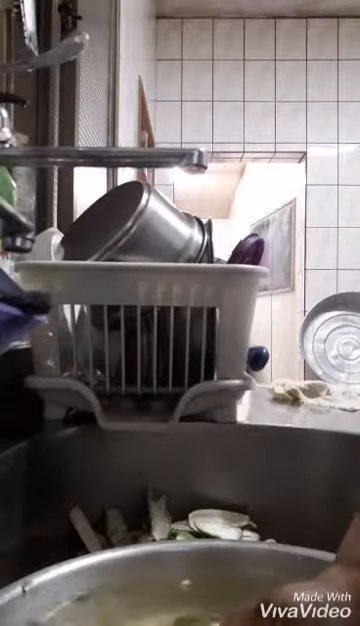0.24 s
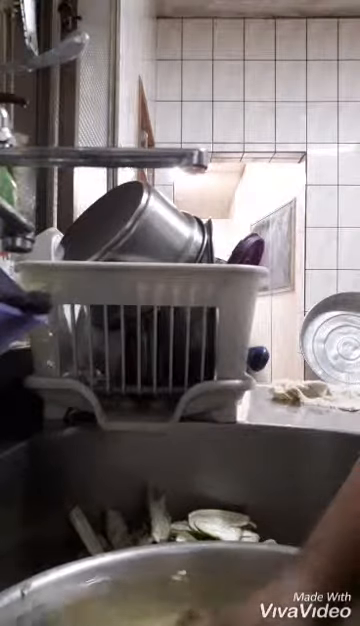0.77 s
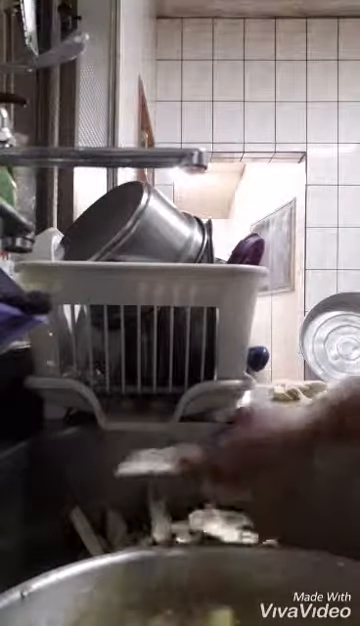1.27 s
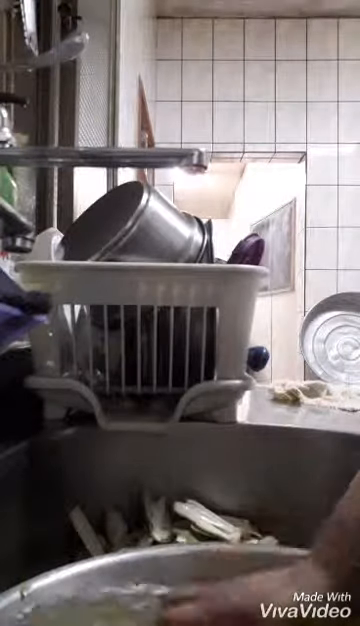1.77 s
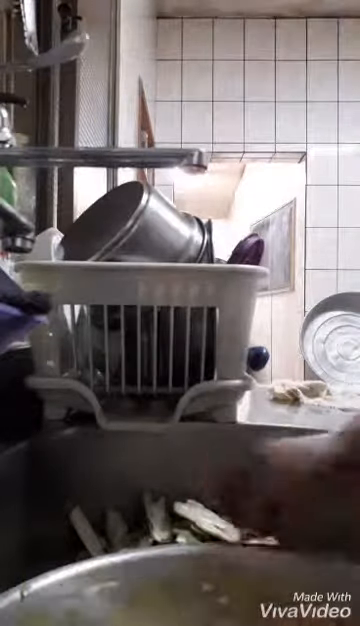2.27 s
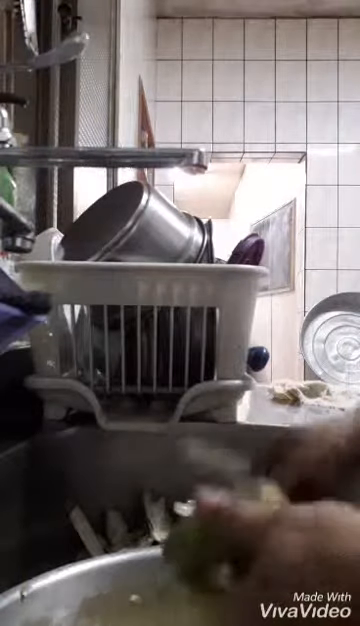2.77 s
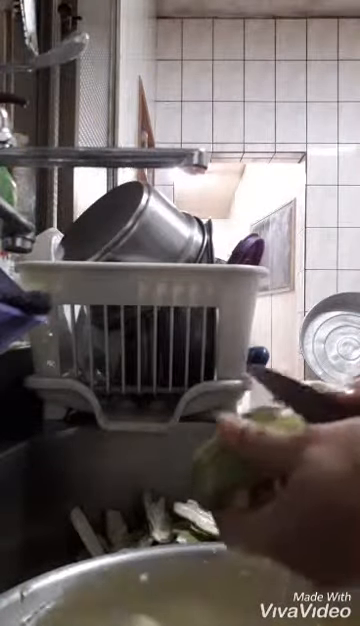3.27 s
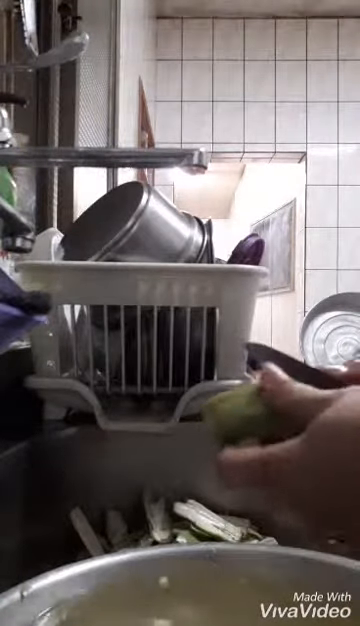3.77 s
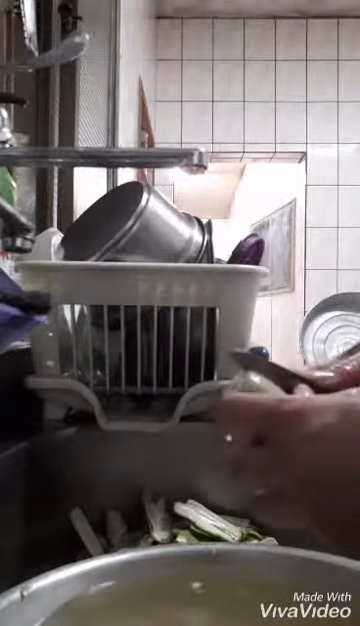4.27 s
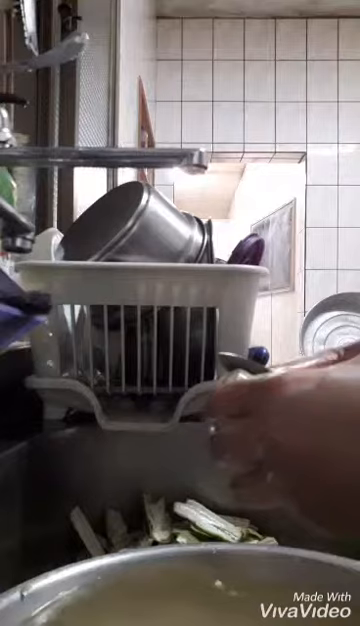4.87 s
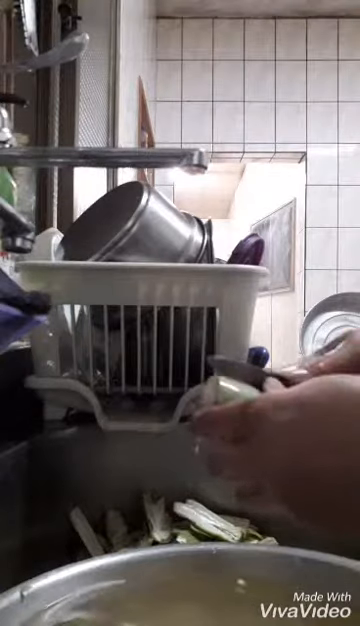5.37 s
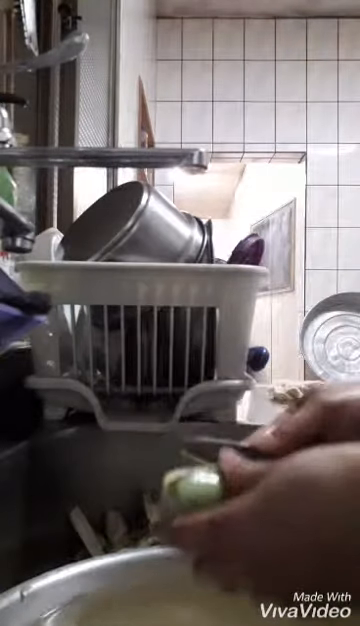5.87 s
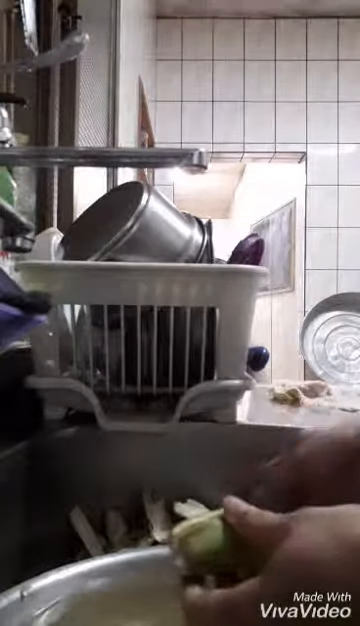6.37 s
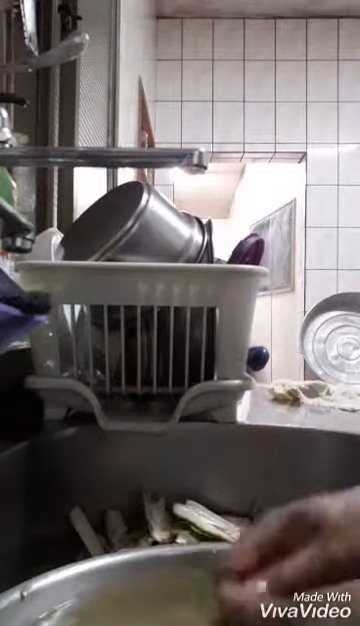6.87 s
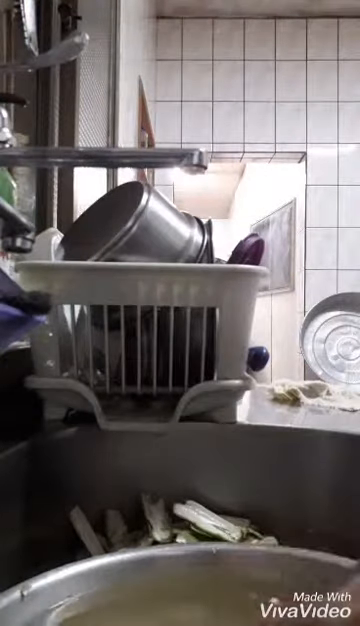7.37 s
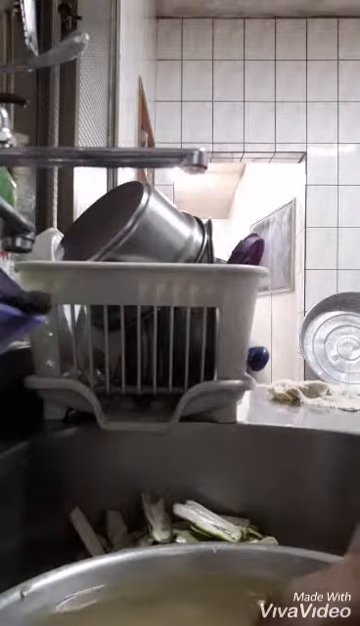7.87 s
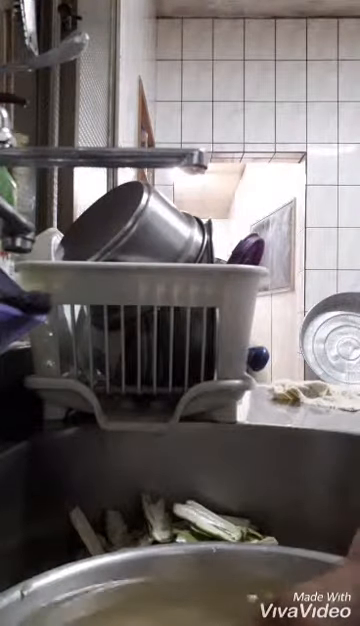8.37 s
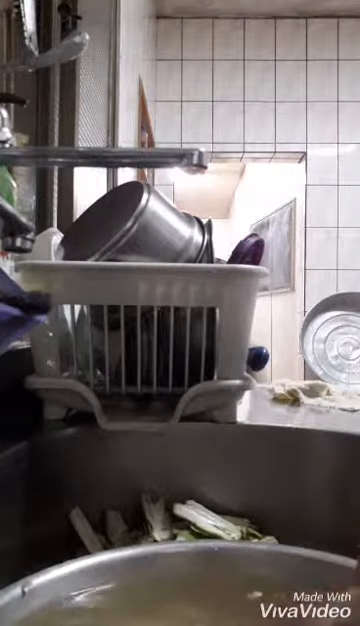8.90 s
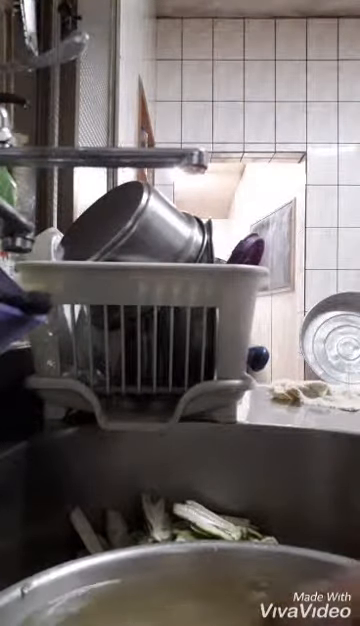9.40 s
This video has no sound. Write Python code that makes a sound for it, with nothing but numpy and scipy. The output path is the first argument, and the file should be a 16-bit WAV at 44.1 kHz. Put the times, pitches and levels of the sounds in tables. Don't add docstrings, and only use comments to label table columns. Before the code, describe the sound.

Close, slightly rough pickup in a small tiled kitchen, with low fridge hum, room air and muffled street roar. From 0 to 3 seconds hands rinse produce in a metal basin: soft pats, a wet slap and hollow knock near 0.5, bubbling plops around 1, fizzy spits and squirts at 1.4, the sharpest splat at 1.9, a bright ringing drip at 2.1. A bubble squeaks upward near 3.1. From 3 to 6 peel crackles and tears sparsely while a low engine revs, rises and leaves, street roar strongest around 5.5; a crisp wet crack lands at 5.8. At 6.6 a knife clatters onto the steel sink, bouncing and ringing, with a heavy bump at 6.75. The background drops sharply. Quiet wet handling and metallic scrapes follow around 7.2-7.9, then near silence, faint scraping at 8.8, and a strong splat cluster at 9.2 as ambience recovers until 9.6.

```python
import sys
import numpy as np
from scipy import signal
from scipy.io import wavfile

SR = 44100
rng = np.random.default_rng(int(sys.argv[2]) if len(sys.argv) > 2 else 0)


def store_pcm(level_fs):
    pcm = np.round(np.clip(level_fs, -1, 1) * 32767).astype(np.int16)
    wavfile.write(sys.argv[1], SR, np.atleast_2d(pcm).T)


def makeup_ratio(level_db):
    decades = np.asarray(level_db, float) / 20
    return 10 ** decades


N = 425124

# t/s, peak level/dB, centre f/Hz
SPLATS = [(0.2902, -29, 2970), (0.4586, -15.5, 2900), (1.0033, -33, 3200), (1.031, -19, 2530),
          (1.55, -26, 4800), (1.894, -12, 4300), (1.913, -13, 4500), (1.9175, -2, 3300),
          (2.2702, -19.5, 1270), (2.303, -19.5, 4970), (2.3975, -21.5, 4480), (2.4762, -26, 2350),
          (3.167, -27, 4150), (3.2091, -25, 3450), (3.7655, -25.5, 5500), (4.1827, -28.5, 2700),
          (5.7945, -6, 5630), (5.811, -18, 3520), (5.831, -16, 4500), (1.4365, -21, 6550),
          (5.8923, -19, 2560), (7.2667, -39, 3800), (7.3082, -31, 2700), (7.652, -36, 6560),
          (7.7224, -18.5, 3000), (7.8722, -31, 2770), (9.148, -21, 5560), (9.1535, -27, 4750),
          (9.1862, -5.5, 3330), (9.199, -25, 3000), (9.2465, -20, 3260), (9.4617, -32.5, 2700),
          (9.4803, -24.5, 5200)]
# t/s, peak level/dB, centre f/Hz
PATS = [(0.237, -37.5, 1870), (0.5547, -32, 1970), (.008, -25.5, 1500), (1.498, -22, 3300),
        (1.876, -26, 3700), (1.858, -15.5, 2230), (1.992, -18.5, 3080), (2.0388, -32, 3180),
        (2.0842, -25, 2170), (2.1057, -14, 3600), (2.823, -34, 1276), (2.8414, -24, 3020),
        (3.0662, -15.5, 2400), (3.1742, -34, 2620), (7.4423, -40, 2890), (7.733, -29, 2000),
        (7.748, -23, 4500), (7.761, -17.5, 2600), (7.768, -23, 3200), (7.59, -42, 2500), (2.822, -34, 3700),
        (8.5136, -38, 3100), (8.8795, -35.5, 4770), (9.1667, -13, 3030), (9.274, -22, 3050),
        (9.2937, -18.5, 3700), (9.3179, -20, 4630)]
# t/s, peak level/dB, centre f/Hz
SPITS = [(0.223, -32, 8600), (1.327, -21.5, 6760), (1.3993, -25, 7100), (1.416, -22, 6800),
         (1.857, -22, 6500), (1.885, -26, 8500), (9.225, -23, 8000), (9.246, -28, 8200),
         (1.4353, -16, 7000), (1.4652, -14.5, 7500), (1.611, -17.5, 8300), (1.646, -20.5, 8300),
         (1.8158, -26.5, 6300), (2.9877, -31, 7300), (3.416, -29, 6830), (3.807, -31, 5500),
         (4.2985, -34, 7500), (4.989, -20.5, 6060), (5.1377, -22, 7700), (5.1991, -17.5, 8060),
         (5.736, -24, 7000), (5.765, -24, 8560), (5.785, -24, 8300), (5.79, -8, 8600), (5.829, -13, 9000),
         (5.838, -19, 9000), (7.243, -39, 7500), (7.27, -36, 8000), (7.446, -39, 8500),
         (5.868, -16.5, 8500), (7.6825, -34, 8290), (7.7025, -34, 7980), (7.805, -16.5, 6000),
         (8.959, -36.5, 8200), (9.0305, -30, 8200), (9.0361, -24, 8200)]
# t/s, peak level/dB, centre f/Hz
CLOSE_PATS = [(1.826, -26, 9000), (2.082, -28, 8800), (2.243, -26, 9000), (2.277, -24, 4000),
              (2.328, -26, 8500), (7.295, -36, 6500), (7.33, -36, 7500), (7.49, -41, 2900),
              (7.515, -43, 5000), (7.62, -43, 6000), (9.024, -36, 3000), (9.147, -24, 2400),
              (9.188, -12, 1300), (9.222, -21, 3000), (9.481, -27, 2000), (9.482, -25, 9000)]
# t/s, peak level/dB, centre f/Hz
TICKS = [(1.2168, -35, 7560), (1.2321, -26, 5200), (1.2516, -28, 7840), (1.5219, -31, 8000),
         (1.6676, -27, 8560), (1.726, -32, 8830), (1.901, -18, 6500), (2.0502, -26, 6050),
         (2.149, -22, 5700), (2.2394, -25, 6080), (2.2872, -18.5, 5370), (2.3255, -28, 8400),
         (2.786, -31, 7730), (2.9625, -33, 9210), (3.0078, -34, 7760), (3.0842, -34, 7360),
         (3.1253, -35.5, 8490), (3.1829, -30, 8670), (3.2425, -31, 8850), (3.5334, -28.5, 8900),
         (3.6431, -31.5, 7600), (4.5984, -32.5, 8400), (4.9252, -33, 5420), (5.4494, -28.5, 7540),
         (6.045, -27, 6890), (7.3844, -42, 8050), (8.1466, -45, 8180), (8.68, -50.5, 6000),
         (1.47, -24, 3580), (1.438, -21, 2900), (8.7914, -49.5, 8430)]
# t/s, peak level/dB, centre f/Hz
THUDS = [
    (2.062, -24, 300),
    (2.3, -41, 350),
    (7.73, -22.5, 810),
    (6.752, -13, 400),
    (9.187, -21, 420),
]
# t/s, peak level/dB, centre f/Hz
TAPS = [(.555, -25.5, 500), (.607, -26, 550), (.638, -28, 500), (.69, -30, 700), (1.993, -24.5, 600),
        (2.011, -25, 500), (2.039, -28, 450), (2.057, -29, 350), (2.69, -25, 400), (2.72, -31, 452),
        (7.85, -37, 500), (7.802, -38, 500), (2.11, -30, 1500)]
# start t/s, length/s, splash level/dB, gurgle re splash/dB
STROKES = [(0, 0.05, -55.5, 14.5), (0.467, 0.27, -57.5, 13), (0.976, 0.19, -59, 1), (1.189, 0.15, -51, -25),
           (1.576, 0.11, -46, -6), (1.859, 0.15, -39.5, -2), (1.93, 0.2, -46, 2), (2.652, 0.39, -57, -6),
           (7.36, 0.27, -60, -5), (7.54, 0.29, -60, -11), (7.757, 0.28, -60, 1.5), (9.303, 0.4, -60, -3)]
# start t/s, length/s, fizz level/dB, splash re fizz/dB
TEARS = [(0.228, 0.036, -44, 3), (1.126, 0.066, -56, 5), (1.317, 0.13, -48, -2), (2.105, 0.33, -48, 5),
         (3.75, 0.39, -53.5, 9), (3.977, 0.054, -50.5, 4), (4.078, 0.054, -45, 1), (4.175, 0.042, -42.5, 0),
         (4.276, 0.039, -45, 0), (4.8, 0.45, -48.5, 1), (5.125, 0.16, -34.5, -30),
         (5.727, 0.21, -33.5, -10), (7.22, 0.16, -50, -6), (7.716, 0.07, -38.5, 1),
         (8.816, 0.21, -58, -4.5), (9.008, 0.12, -51.5, -2.5), (9.146, 0.05, -42, 2),
         (9.16, 0.22, -43.5, 0)]
# t/s, peak level/dB, f/Hz
DRIPS = [(0.246, -29, 1750), (1.3, -33, 3650), (1.245, -37, 2900), (1.292, -33, 2900), (1.381, -37, 2360),
         (1.459, -28, 3700), (2.117, -22, 3770), (2.127, -23, 3480), (2.137, -31, 3800), (2.143, -28, 4050),
         (2.158, -31, 4000), (2.181, -28, 3900), (1.53, -35, 2300), (1.2, -38, 6100), (1.335, -19.5, 6330),
         (1.443, -27, 5500), (1.466, -18, 7100), (1.424, -30, 7100), (3.417, -23, 5500), (2.4, -30, 3140),
         (2.085, -35, 2160), (2.219, -24, 3350), (1.271, -25, 4140), (1.421, -30, 2500),
         (1.4265, -25, 2460), (1.436, -22, 3430), (2.1053, -7, 3880), (2.2043, -24, 2270),
         (2.2189, -24.5, 2210), (2.8663, -28.5, 2460), (3.1729, -14, 2440), (3.209, -18.5, 3170),
         (3.2787, -26, 3950), (4.2985, -21, 5500), (7.7, -42, 2400)]
# t/s, peak level/dB, f/Hz, t60/s
PLOPS = [(1.044, -20, 920, 0.05), (1.612, -22, 900, 0.08), (1.633, -32, 910, .07), (1.648, -33, 890, .06),
         (1.664, -34, 900, .14), (1.604, -30, 520, .06), (1.47, -33, 2050, .15), (1.057, -23, 960, .08),
         (1.043, -27, 1300, .02), (1.94, -31, 780, .1), (1.98, -31, 760, .06), (2.178, -31, 680, .05),
         (1.615, -28, 450, .08), (3.07, -31.5, 1070, 0.046), (3.096, -36, 1350, .05),
         (3.174, -30, 2420, 0.18), (3.094, -37, 3950, 0.05), (7.098, -38, 3200, .04),
         (7.586, -44, 1580, .05), (7.306, -38, 1900, .03), (1.594, -32, 600, .06), (2.232, -28, 900, .04),
         (2.312, -27, 1250, .04), (1.629, -26, 1300, .015), (5.81, -25, 1200, .05),
         (1.917, -18.5, 820, 0.049), (2.164, -30, 657, 0.051), (1.9, -27, 880, 0.047),
         (2.204, -31, 1330, 0.044), (2, -45, 1300, .03), (2.1, -37, 960, .03), (1.917, -17, 1800, .03),
         (1.866, -27, 2000, 0.068), (0.011, -35, 1800, 0.09), (1.222, -41, 1300, .03),
         (2.269, -22, 1144, 0.067)]
# t/s, peak level/dB, f/Hz
SQUIRTS = [
    (1.432, -25, 2900),
    (1.465, -23, 3640),
    (1.5, -35, 3700),
    (2.256, -33, 3500),
    (2.738, -34, 3600),
    (3.068, -20, 4160),
]
# t/s, peak level/dB, f/Hz, t60/s
BUMPS = [
    (.46, -22.5, 307, 0.075),
    (.513, -19, 303, 0.024),
    (.526, -21, 330, 0.025),
    (6.748, -9, 341, 0.074),
    (6.757, -5, 311, 0.044),
    (6.768, -12, 395, 0.047),
    (6.75, -12, 878, 0.035),
    (6.75, -27, 130.4, 0.36),
]
# f/Hz, level/dB, t60/s
BASIN = [(867, -18, 0.03), (1762, -0.5, 0.046), (2562, -0.5, .055), (3420, -5, 0.033), (4540, -20, .033)]
# f/Hz, level/dB, t60/s
BLADE = [(2920, -37, .02), (4800, -40, .012), (7250, -37, .025), (8130, -34, .025)]
# t/s, blow level/dB, crack level/dB
KNIFE = [
    (6.591, -16.5, 12.5),
    (6.6165, -19, 3),
    (6.62, -25.5, 2),
    (6.626, -28, -3),
    (6.655, -23, -14),
    (6.675, -25, -7),
    (6.753, -34, -14.5),
    (6.796, -50, -28),
]
# level/dB, t60/s
SINK = [(-5, .4), (5, 0.25), (1, 0.3), (-4, .3), (-3, 0.3), (-8, .15), (-3, 0.25), (-14, .3), (-6, 0.55),
        (2.5, 0.55), (1, .3), (0, 0.14), (-2.5, .5), (-6, .35), (-5, .25), (-1, .3), (-3, .15), (-9, .12),
        (-8, .2), (4.5, .1), (-12, .15), (-14, .2), (-14, .06), (-11, .1), (-16.5, .15), (-13, .4),
        (-9, .3), (-4, .25), (-4, .25), (-7, .08), (-11, .5)]
SINK_HZ = [428, 719, 1000, 1241, 1271, 1330, 1408, 1440, 2066, 1524, 1592, 2050, 2083, 2140, 2384, 2668,
           2901, 3451, 3657, 4297, 4791, 5383, 6400, 7140, 8075, 1978, 2303, 2580, 2720, 3940, 1503]
# t/s, firing f/Hz
ENGINE = [
    (3.2, 40.1),
    (3.9, 48.5),
    (4.85, 57.5),
    (5.4, 61.5),
    (6.6, 70.3),
    (7.6, 75.3),
]
# f/Hz, width/Hz, level/dB
WINDOW = [(48.5, 3.7, -50), (57.5, 2.8, -46), (61.5, 0.92, -55.5), (66.94, 3.6, -62), (96.5, 16, -52.5),
          (119, 2.9, -44), (136.8, 4.2, -49.5), (150, 3, -61), (168, 3.3, -46)]
# middle t/s, length/s, f/Hz, glide/(Hz/s), level/dB
DRONES = [
    (0.77, 0.31, 140, -17.5, -48.5),
    (1.9, 3.1, 151, -18, -49),
    (5.45, 3.2, 156, -2, -42.5),
    (5.15, 0.81, 169, -13.5, -46),
    (5.35, 0.37, 336.4, -23.5, -43.5),
]
# middle t/s, length/s, f/Hz, glide/(Hz/s), level/dB
WHINES = [
    (.3, 3.6, 1960, 0, -63),
    (9.56, .22, 1667, 0, -64),
    (8.6, 8, 3150, 0, -77),
]
# t/s, level/dB
STREET = [(0, -47), (.6, -49), (1.5, -45), (2.6, -48), (3.5, -45), (4, -42), (4.5, -40), (5.2, -33.5),
          (5.5, -32.5), (6, -35), (6.6, -38.5), (6.95, -48), (7.4, -49), (9.64, -54)]
# f/Hz, level per Hz/dB
STREET_COLOUR = [(18, -58), (30, -31), (54, -24.5), (88, -28), (157, -0.5), (276, -8.5), (327, -7),
                 (438, -13), (601, -11), (679, -10.5), (909, -15), (2860, -21.5), (10200, -42),
                 (13200, -63), (22000, -120)]
# f/Hz, width/Hz, level/dB
STREET_RINGS = [(243, 13, -0.3), (332, 14, 1), (420, 20, -1.5), (598.4, 21, 1), (782, 40, 2),
                (912, 13, 1.5), (994, 20, 0.4), (1155, 25, 2.5), (1282, 22, 2.5), (2868, 43, 0.5)]
# f/Hz, level per Hz/dB
ROOM_AIR = [(28, -54.5), (50, -16.5), (86, -10), (150, -4), (200, -18.5), (440, -28), (870, -19),
            (2500, -25.5), (3150, -27), (3600, -27.5), (10200, -39.5), (11500, -60)]
# t/s, gain/dB
GAIN = [
    (0, 0),
    (6.7, -3),
    (6.95, -8),
    (7.4, -13),
    (9.1, -12.5),
    (9.3, -6),
    (9.64, -3.5),
]

BLADE_FROM_S = 7.2
SHARP_ATTACK_S, SOFT_ATTACK_S = 0.0004, 0.0009
DRIP_CYCLES, SQUIRT_CYCLES = 60, 55


def rms_one(x):
    return x / np.sqrt(np.mean(x ** 2) + 1e-20)


def in_time(rows):
    times_s, *columns = np.transpose(rows)
    return [np.interp(np.arange(N) / SR, times_s, column) for column in columns]


def drift(rate_hz):
    r = np.exp(-80 * np.pi * rate_hz / SR)
    slow = signal.lfilter([1], [1, -2 * r, r * r], rng.standard_normal(N // 40 + 2002))[2000:]
    return np.interp(np.arange(N) / 40, np.arange(len(slow)), rms_one(slow))


def band(x, low_hz, high_hz):
    edges_hz = [low_hz, min(high_hz, 0.45 * SR)]
    return signal.sosfilt(signal.butter(2, edges_hz, "band", fs=SR, output="sos"), x)


def ring(clicks, hz, t60_s):
    r, w = makeup_ratio(-60 / (t60_s * SR)), 2 * np.pi * hz / SR
    return signal.lfilter([0, np.sin(w)], [1, -2 * r * np.cos(w), r * r], clicks + 1e-18)


def add(out, s, piece):
    i = round(s * SR)
    out[i:i + len(piece)] += piece[:N - i]


def bursts(events, t60_s, width, snap_db=-60, attack_s=0.0036):
    out, t = np.zeros(N), np.arange(3000) / SR
    shape = (1 - np.exp(-t / attack_s)) * makeup_ratio(-60 * t / t60_s)
    for (s, peak_db, hz), white in zip(events, rng.standard_normal((len(events), 2, len(t)))):
        edges_hz = hz / width, min(hz * width, 10500)
        core = band(band(white[0] * shape, *edges_hz), *edges_hz)
        snap = band(white[1] * shape, 3100, 10100)
        slap = core / np.abs(core).max() + makeup_ratio(snap_db) * snap / np.abs(snap).max()
        add(out, s, makeup_ratio(peak_db - 6.5) * slap)
    return out


def fizz(low_hz, high_hz, per_s, cycles, hiss):
    sizes = makeup_ratio(3.6 * np.minimum(rng.exponential(1, N), 4)) * rng.choice([-1, 1], N)
    born = rng.random(N) < per_s * makeup_ratio(5 * drift(25)) / SR
    pitches_hz, dealt = np.geomspace(low_hz, high_hz, 14), rng.integers(0, 14, N)
    grains = sum(ring(sizes * born * (dealt == k), hz, cycles / hz) for k, hz in enumerate(pitches_hz))
    grains = rms_one(band(grains, 0.98 * low_hz, 1.16 * high_hz))
    return rms_one(grains + hiss * rms_one(band(rng.standard_normal(N), low_hz, high_hz)))


def slosh():
    treble = fizz(5200, 10300, 2000, 35, 0.8)
    splash = fizz(1100, 5500, 600, 24, 0.8)
    gurgle = band(fizz(170, 1100, 220, 1.8, 0.44), 130, 1800)
    gates = np.zeros((3, N))
    strokes = [(s, length_s, db - 2.5, db, db + low_db) for s, length_s, db, low_db in STROKES]
    tears = [(s, length_s, db, db + mid_db, db + mid_db - 15.5) for s, length_s, db, mid_db in TEARS]
    for s, length_s, *levels_db in strokes + tears:
        t = np.arange(round(length_s * SR)) / length_s / SR
        shape = np.clip(np.minimum(t / 0.22, (1 - t) / 0.5), 0, 1)
        for gate, level_db in zip(gates, levels_db):
            add(gate, s, makeup_ratio(level_db) * shape)
    return np.sum(gates * (treble, splash, gurgle), axis=0)


def bubbles(events, onset_s, rise_octaves):
    out, t = np.zeros(N), np.arange(9000) / SR
    shaking = makeup_ratio(2.5 * drift(40))
    for s, peak_db, hz, t60_s in events:
        pitch_hz = hz * 2 ** (rise_octaves * (0.6 - np.exp(-t / 0.0026)))
        shape = (1 - np.exp(-t / onset_s)) * makeup_ratio(-60 * t / np.clip(t60_s, 0.01, 0.3))
        sine = np.sin(2 * np.pi * np.cumsum(pitch_hz) / SR)
        add(out, s, makeup_ratio(peak_db - 6.0) * shape / shape.max() * sine)
    return out * shaking


def ringing(events, cycles):
    return [(s, peak_db, hz, cycles / hz) for s, peak_db, hz in events]


def droplets():
    events = []
    for s, length_s, splash_db, _ in STROKES:
        if s >= BLADE_FROM_S:
            continue
        luck = rng.random((16, 3))[:int(length_s * 60)]
        for when, small, high in luck:
            peak_db = min(splash_db, -50) + 14 - 8 * small
            events.append((s + length_s * when, peak_db, 1900 * 2.6 ** high))
    return bubbles(ringing(events, DRIP_CYCLES), 0.0015, 0.2)


def knock():
    clicks = np.zeros(N)
    for s in (0.4587, 0.4612):
        clicks[round(s * SR)] = makeup_ratio(-26)
    return sum(makeup_ratio(level_db) * (-1) ** k * ring(clicks, hz, t60_s)
               for k, (hz, level_db, t60_s) in enumerate(BASIN))


def blade(water):
    late = water * (np.arange(N) > BLADE_FROM_S * SR)
    return sum(makeup_ratio(level_db) * ring(late, hz, t60_s) for hz, level_db, t60_s in BLADE)


def knife():
    table, out = np.array(KNIFE), np.zeros(N)
    start_s = table[0, 0]
    at = np.round((table[:, 0] - start_s) * SR).astype(int)
    blows, hits = np.zeros((2, SR))
    blows[at], hits[at] = makeup_ratio(table[:, 1]), makeup_ratio(table[:, 2])
    tip_blows = blows * np.r_[makeup_ratio(-12), np.ones(SR - 1)]
    crack, rattle = (signal.lfilter([1], [1, -makeup_ratio(-60 / (t60_s * SR))], hits + 1e-18)
                     for t60_s in (0.025, 0.42))

    modes = [(hz, *mode) for hz, mode in zip(SINK_HZ, SINK)]
    thicket_hz = np.sort(rng.uniform(1300, 6000, size=90))
    for hz, luck in zip(thicket_hz, rng.uniform(-1.1, 1, size=90)):
        modes.append((hz, -22 - 4 * np.log2(hz / 2000) + 1.5 * luck, 700 / hz))
    sheet = np.zeros(SR)
    for k, (hz, level_db, t60_s) in enumerate(modes):
        drive = (tip_blows if hz < 1100 else blows) + makeup_ratio(-66) * rattle * rng.standard_normal(SR)
        sheet += makeup_ratio(level_db) * (-1) ** k * ring(drive, hz, t60_s)
    t = np.arange(SR) / SR + start_s
    sheet *= makeup_ratio(-5 * np.clip((t - 6.725) / 0.03, 0, 1))

    noise = 0.77 * band(rng.standard_normal(SR) * crack, 3300, 5300)
    noise += makeup_ratio(-22) * band(rng.standard_normal(SR) * rattle, 2400, 5400)
    noise += 0.11 * (crack + 0.03 * rattle) * rng.standard_normal(SR)
    add(out, start_s, sheet + noise)
    return out


def kitchen(x):
    t60_s, first_echo_s = 0.36, 0.0063
    t = np.arange(SR // 2) / SR
    white = rng.standard_normal(len(t)) * np.clip(t / first_echo_s - 1, 0, 1)
    low = signal.lfilter(*signal.butter(1, 4500, fs=SR), white)
    tail = low * makeup_ratio(-60 * t / t60_s) + (white - low) * makeup_ratio(-60 * t / t60_s / 0.63)
    return signal.fftconvolve(x, tail / np.sqrt(np.sum(tail ** 2)))[:N]


def tone(hz, level_db, wobble_db):
    phase = 2 * np.pi * np.cumsum(hz) / SR
    return np.sqrt(2) * makeup_ratio(level_db + wobble_db * drift(2.6)) * np.sin(phase)


def engine():
    t, out = np.arange(N) / SR, np.zeros(N)
    near_db = 0.59 * (in_time(STREET)[0] + 41) + in_time(GAIN)[0]
    near = makeup_ratio(near_db) * np.clip((t - 3.5) / 0.3, 0, 1)
    for order_hz in in_time(ENGINE)[0] * [[1], [2], [3]]:
        window = sum(makeup_ratio(level_db) * np.exp(-((order_hz - hz) / width_hz) ** 2)
                     for hz, width_hz, level_db in WINDOW)
        out += near * window * tone(order_hz, 0, wobble_db=0.5)
    return out


def far_motors():
    t, out = np.arange(N) / SR, np.zeros(N)
    for s, length_s, hz, glide_hz_per_s, level_db in DRONES + WHINES:
        away = 2 * (t - s) / length_s
        faded_db = level_db - 19.5 * np.minimum(away ** 2, 4)
        out += (np.abs(away) < 1.5) * tone(hz + glide_hz_per_s * (t - s), faded_db, wobble_db=2.5)
    return out


def banded_noise(spectrum, patchy_db, tilt_db=0):
    edges_hz = 28 * 2 ** np.arange(0, 8.7, 1 / 3)
    white = rng.standard_normal((2, N))
    table_hz, table_db = np.transpose(spectrum)
    out, power = 0, 0
    for k, (low, high) in enumerate(zip(edges_hz, edges_hz[1:])):
        hz = np.sqrt(low * high)
        level_db = np.interp(np.log(hz), np.log(table_hz), table_db)
        power += makeup_ratio(level_db) ** 2 * (high - low) * 2 / SR
        band_db = level_db + tilt_db * np.log2(hz / 1000) + patchy_db * drift(7.4)
        out = out + makeup_ratio(band_db) * band(white[k % 2], low, high)
    return out / np.sqrt(power)


def street():
    level_db, = in_time(STREET)
    tilt_db = 2.5 + 0.0644 * (level_db + 43.0)
    roar = makeup_ratio(level_db + 0.5) * banded_noise(STREET_COLOUR, 0.65, tilt_db)
    hollows = sum(makeup_ratio(ring_db) * signal.lfilter(*signal.iirpeak(hz, hz / np.clip(width_hz, 5, 200), SR), roar)
                  for hz, width_hz, ring_db in STREET_RINGS)
    return roar + hollows


def background():
    hum = tone(np.full(N, 121), -50.5, wobble_db=1.0)
    air = makeup_ratio(-50.5) * banded_noise(ROOM_AIR, patchy_db=3.0)
    return makeup_ratio(in_time(GAIN)[0]) * (hum + air + street())


def scene():
    water = bursts(SPLATS, 0.033, 1.47, 1.5, SHARP_ATTACK_S)
    water += bursts(PATS, 0.04, 1.49, -18, SOFT_ATTACK_S)
    water += bursts(SPITS, 0.029, 1.22, -1.5, SOFT_ATTACK_S)
    water += bursts(TICKS, 0.018, 1.18) + bursts(THUDS, 0.082, 5.0) + slosh()

    drops = bubbles(ringing(DRIPS, DRIP_CYCLES), 0.0012, 0.1) + bubbles(PLOPS, 0.0012, 0.1)
    drops += bubbles(ringing(SQUIRTS, SQUIRT_CYCLES), 0.0015, 0.3)

    near = water + blade(water) + knock() + bursts(TAPS, 0.018, 2.6, -10, SOFT_ATTACK_S)
    near += bubbles(BUMPS, 0.0006, 0.044) + knife() * makeup_ratio(in_time(GAIN)[0])
    echo = makeup_ratio(-11) * kitchen(near + makeup_ratio(-4) * drops)

    unechoed = droplets() + bursts(CLOSE_PATS, 0.035, 1.4, -12, SOFT_ATTACK_S)
    mix = near + echo + drops + unechoed + engine() + far_motors() + background()
    return mix[None]


def band_limit(x):
    return signal.sosfilt(signal.butter(12, 19000, fs=SR, output="sos"), x)


def record(dry):
    dry = signal.sosfilt(signal.butter(3, 42, "high", fs=SR, output="sos"), dry)
    top_hz = 10610 * 1.0626
    cut = signal.sosfilt(signal.cheby2(12, 60, top_hz, fs=SR, output="sos"), dry)
    image = cut * np.cos(2 * np.pi * 3000 * np.arange(N) / SR)
    for _ in range(3):
        image = band(image, 11500, 12500)
    mix = np.clip(cut + makeup_ratio(-21.5) * image, -1.0, 1.0)
    return band_limit(mix)


dry = scene()
out = record(dry)
store_pcm(out)
```